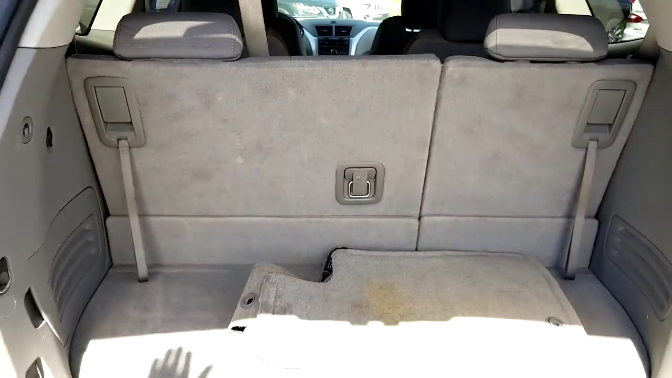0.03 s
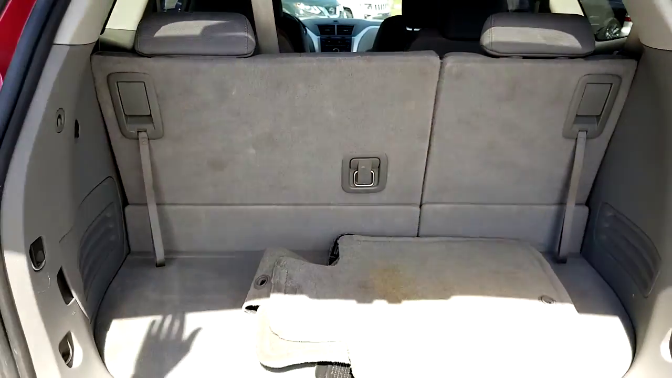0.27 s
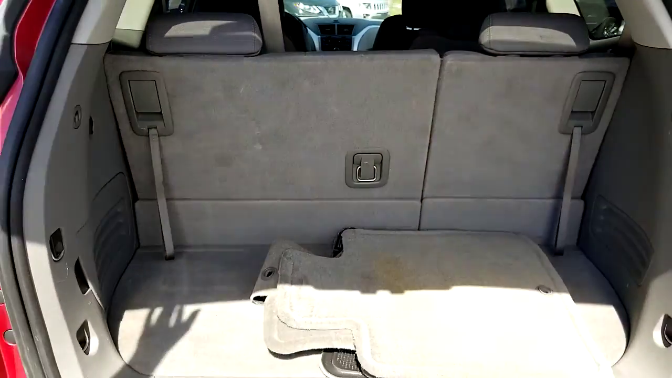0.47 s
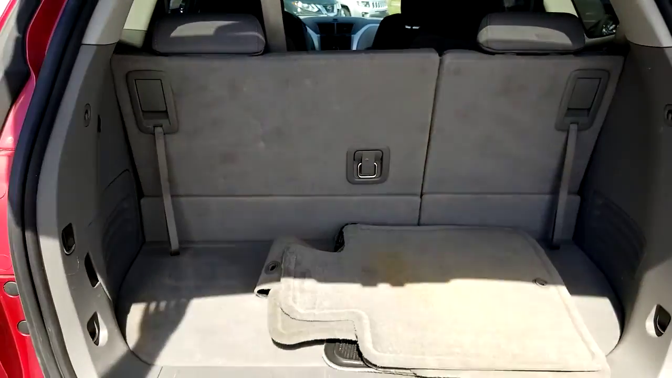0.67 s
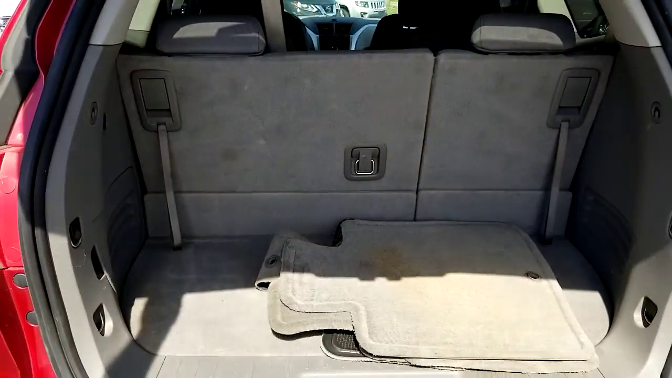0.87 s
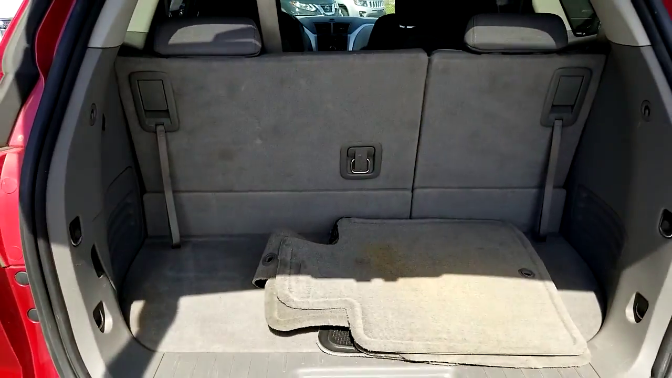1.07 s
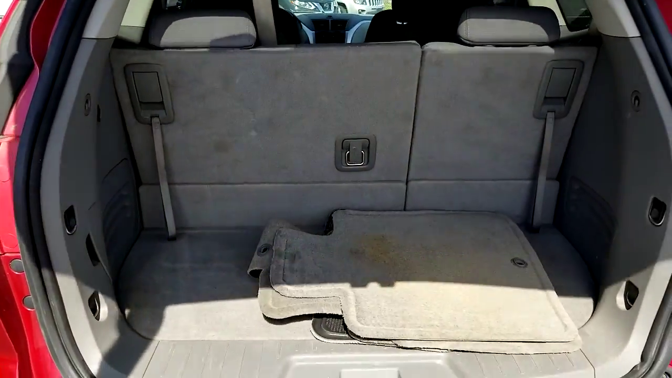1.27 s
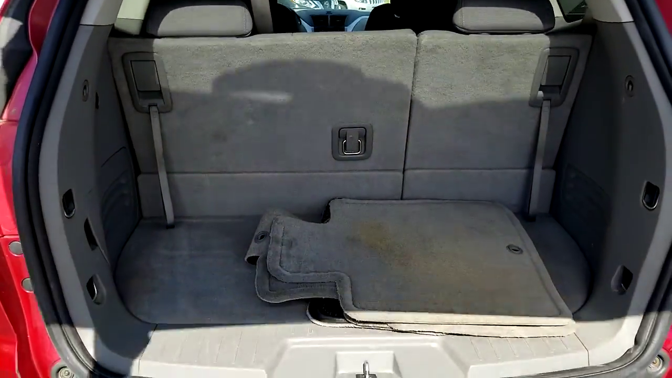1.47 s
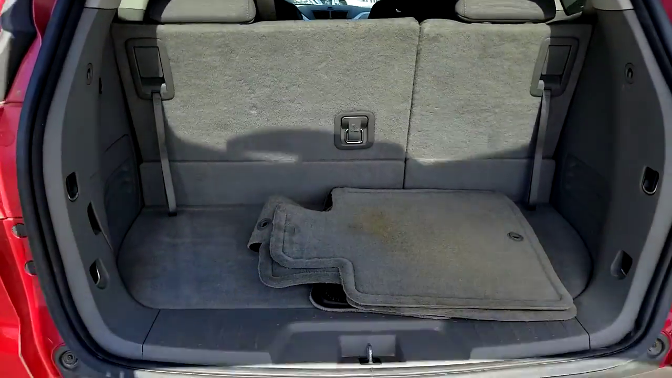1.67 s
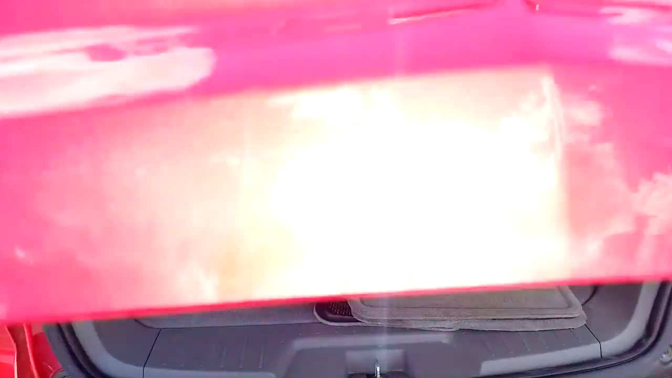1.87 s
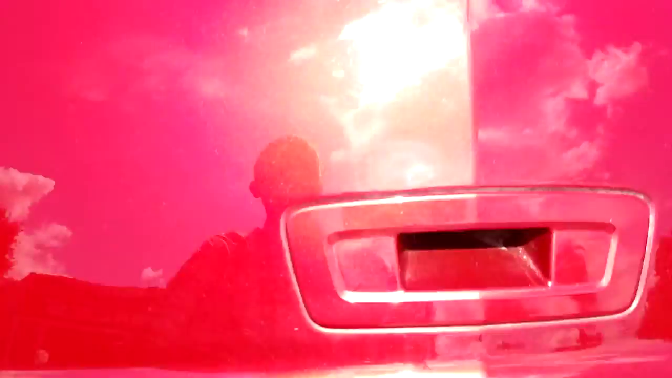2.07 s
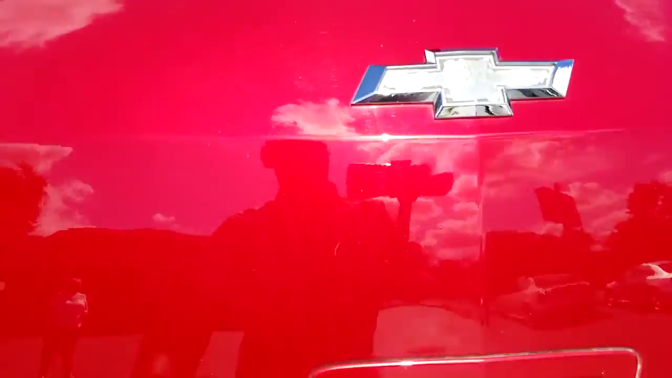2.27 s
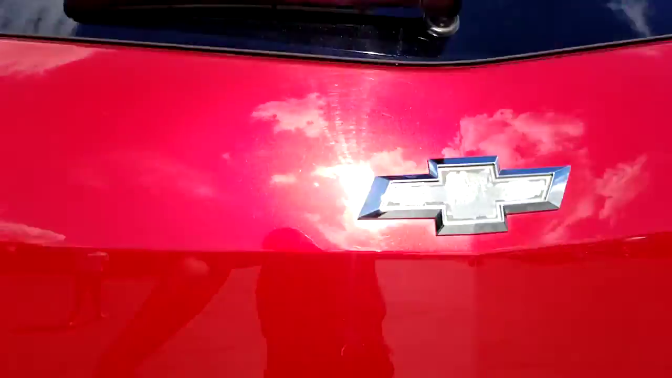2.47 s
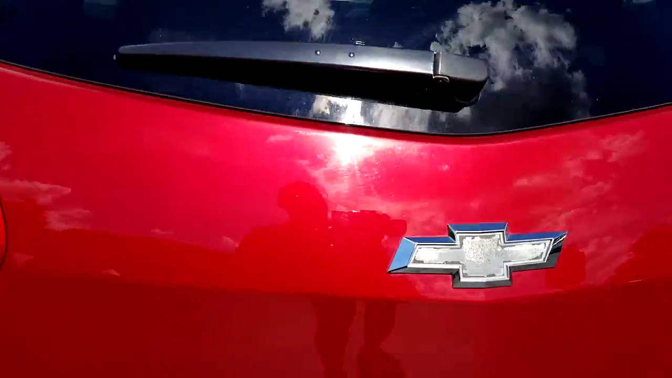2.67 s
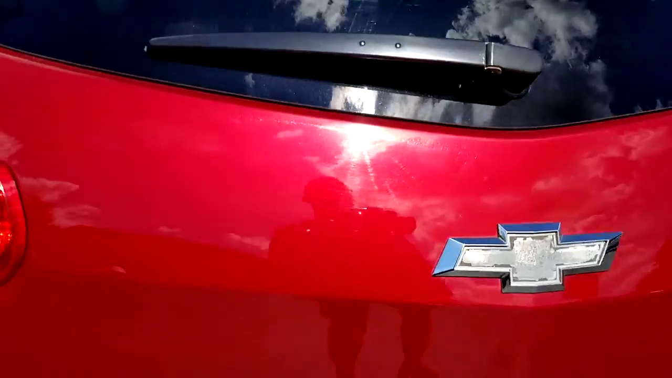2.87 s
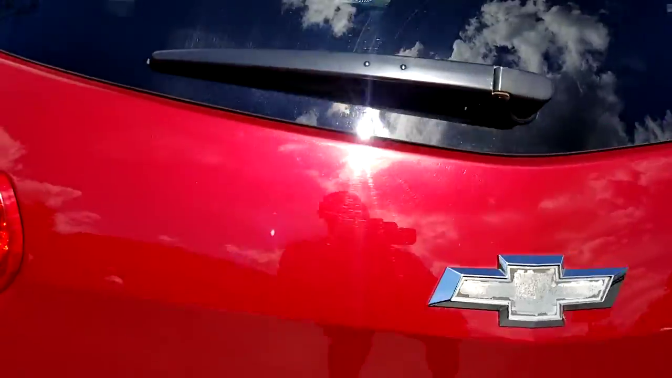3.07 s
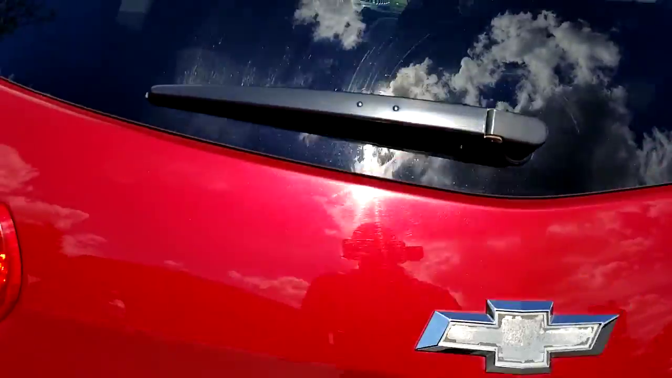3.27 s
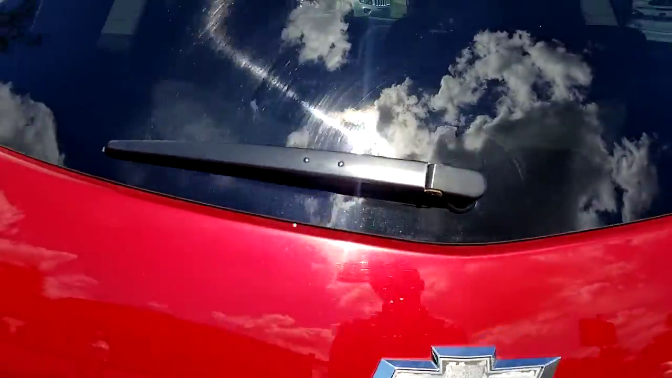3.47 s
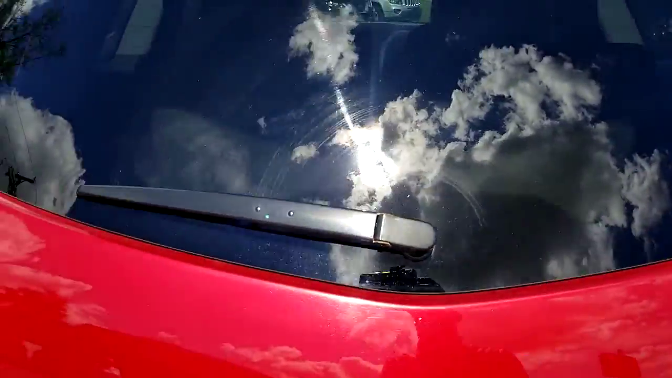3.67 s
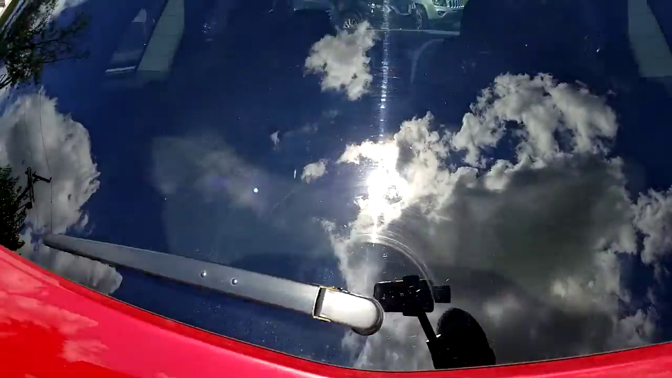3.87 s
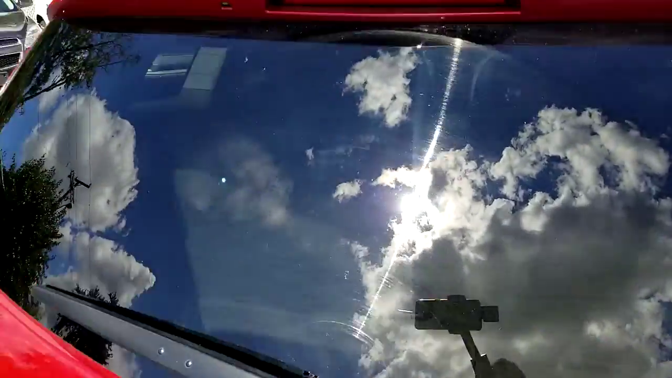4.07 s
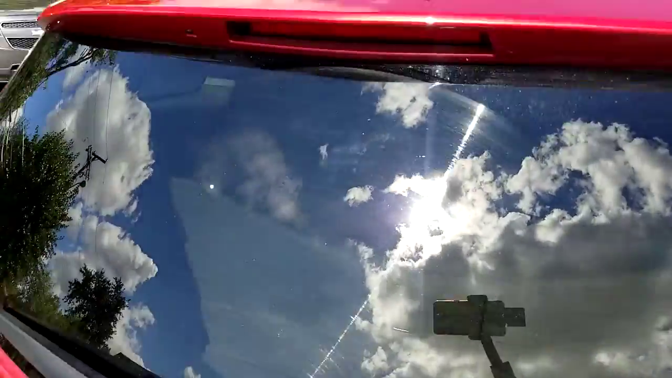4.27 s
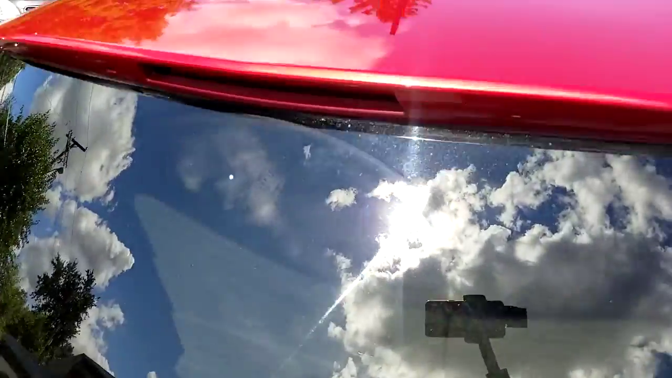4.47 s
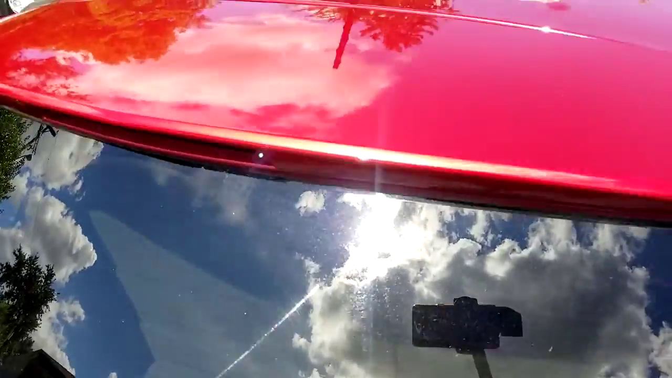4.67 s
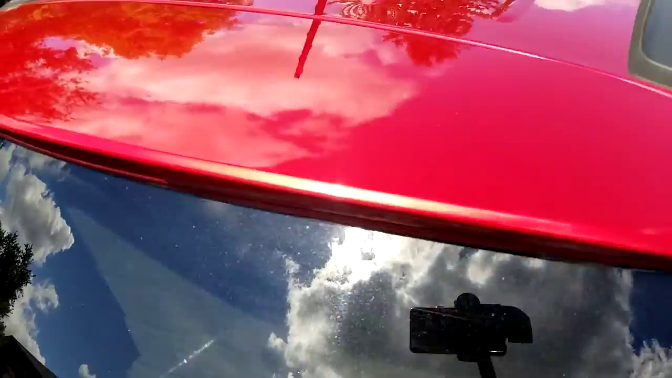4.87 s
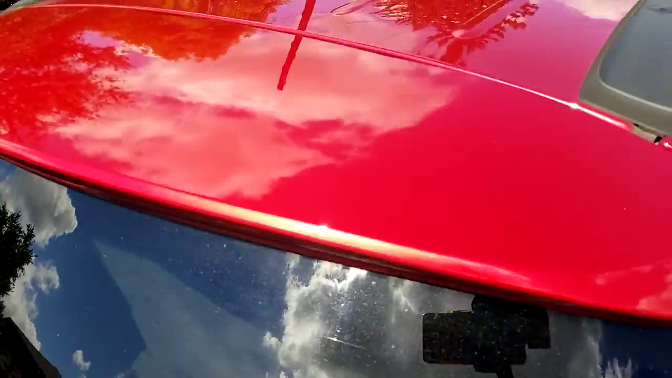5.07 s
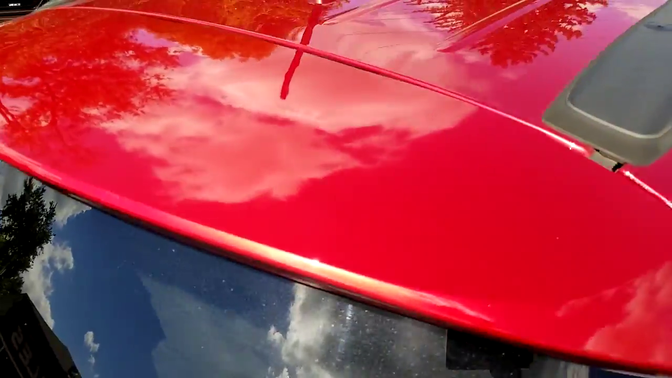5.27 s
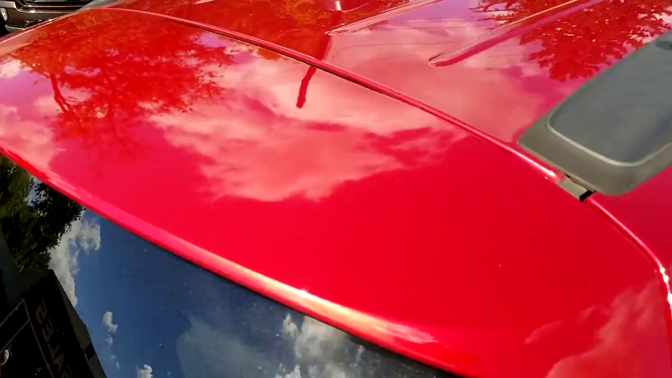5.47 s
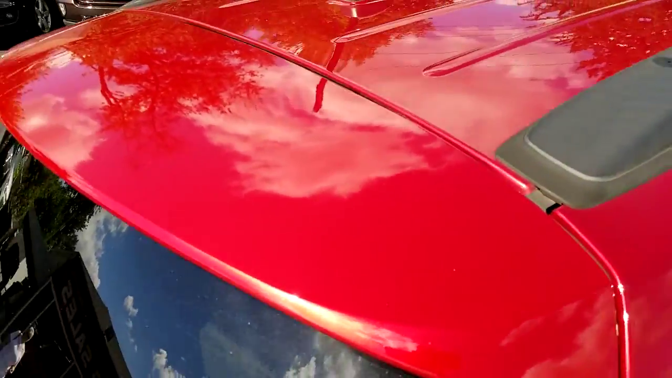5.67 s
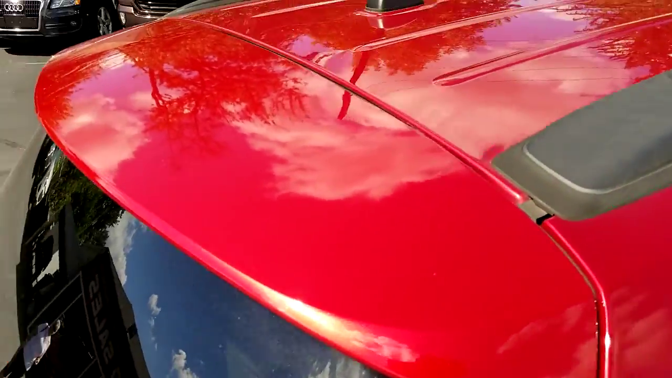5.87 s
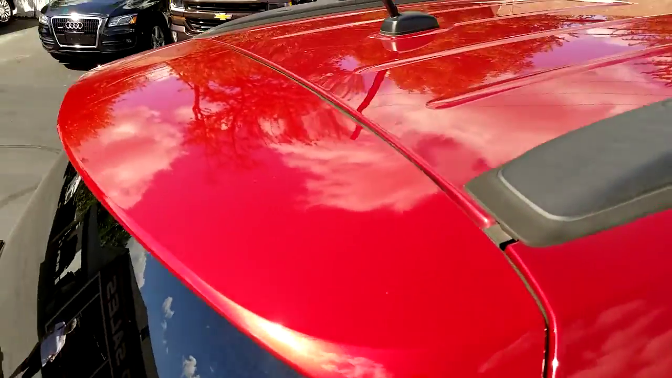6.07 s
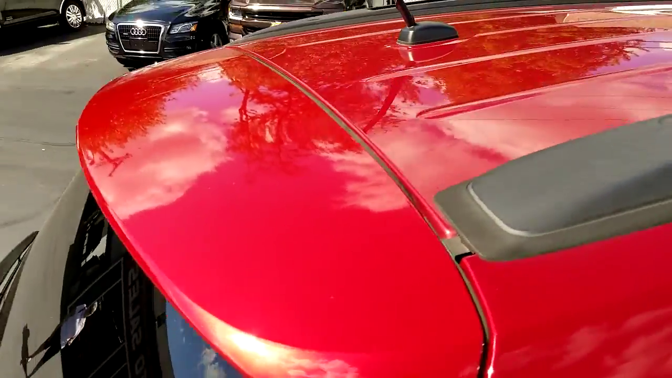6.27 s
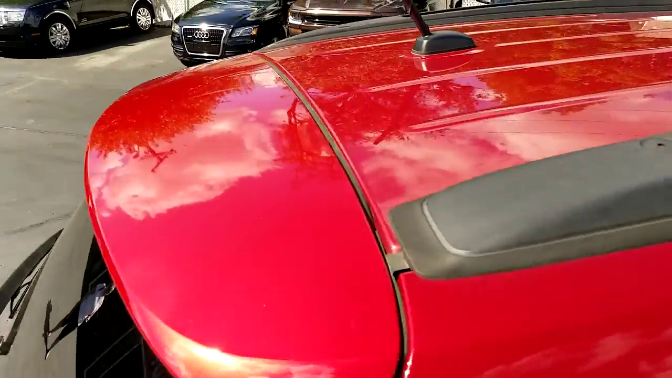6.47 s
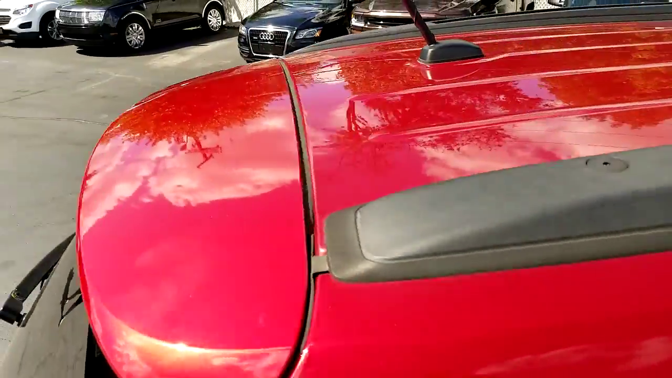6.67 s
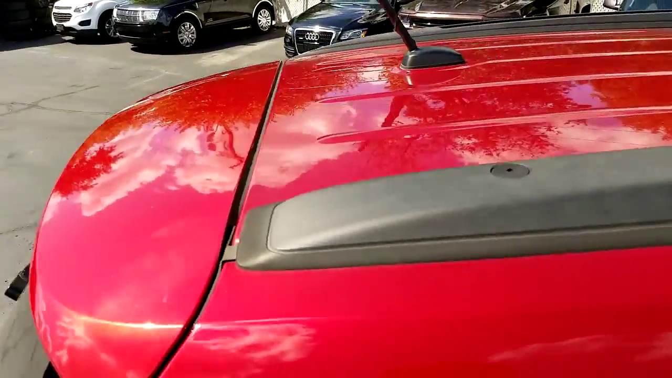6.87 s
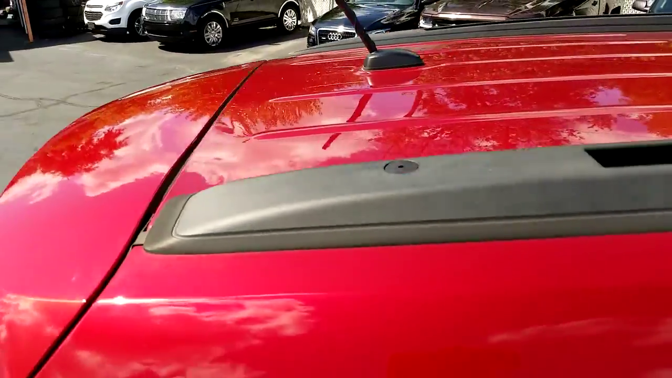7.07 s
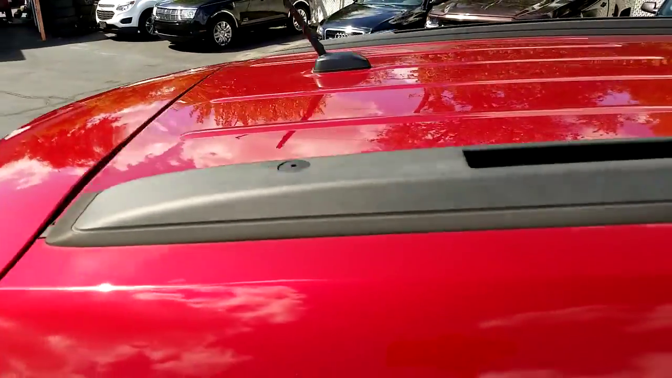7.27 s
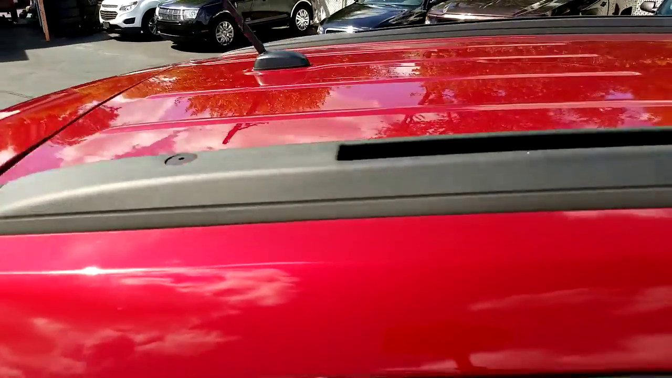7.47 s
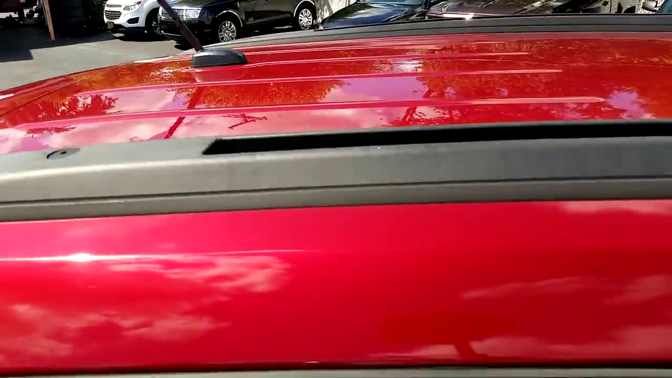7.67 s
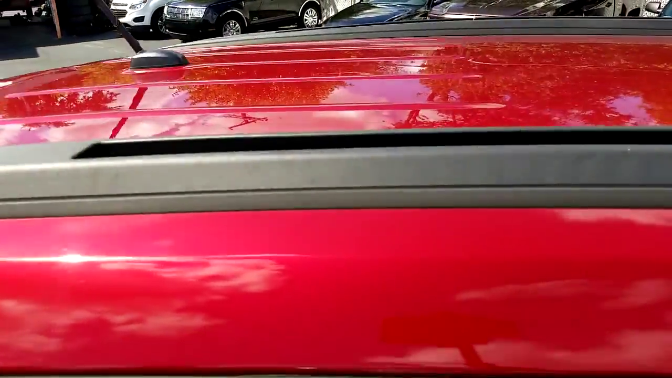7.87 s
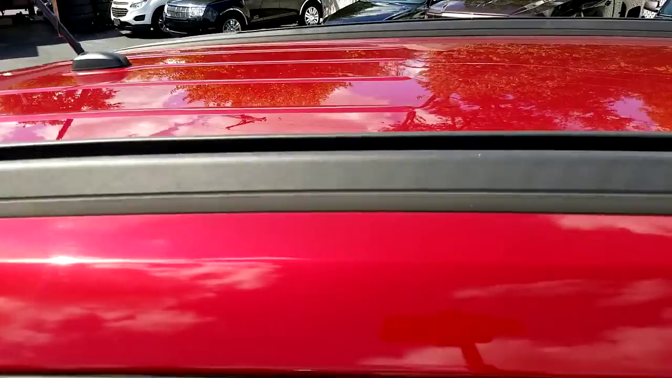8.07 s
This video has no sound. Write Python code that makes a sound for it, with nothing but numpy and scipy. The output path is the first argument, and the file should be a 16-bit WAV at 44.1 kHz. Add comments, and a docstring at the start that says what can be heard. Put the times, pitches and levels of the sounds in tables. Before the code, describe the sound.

Wind thumps the microphone, a car hatch creaks down with hollow knocks and slams with rattle and boom, then a car pulls away nearby.

```python
"""Hatch slam and car pulling away

A car's rear hatch creaks down with hollow knocks and slams: struck modes, rattling noise, a cabin-air boom.
A six-cylinder car nearby pulls away, its note and shaft orders climbing with the firing rate. Shaped noise gives
wind in two microphone ports, far traffic, hums, scuffs and squeaks; damped modes with noise give clicks.
Gain control ducks after the slam and slowly comes back."""
import sys
import numpy as np
from scipy import signal
from scipy.fft import rfft, irfft, next_fast_len
from scipy.io import wavfile
from scipy.ndimage import uniform_filter1d, map_coordinates

SR = 44100
rng = np.random.default_rng(int(sys.argv[2]) if len(sys.argv) > 2 else 0)


def wav_record(signal):
    """Record a signal, one row per channel, as 16-bit PCM in the file named by sys.argv[1]."""
    frames = np.transpose(np.atleast_2d(signal))
    bounded = np.clip(frames, -1, 1)
    # unit amplitude maps onto the largest positive 16-bit level
    quanta = np.round(bounded * 32767).astype(np.int16)
    wavfile.write(sys.argv[1], SR, quanta)


N = 358533


def amp(db):
    """Decibels to amplitude."""
    return 10 ** (np.asarray(db) / 20)


def unit(x):
    """x scaled to rms 1."""
    return x / np.sqrt(np.mean(x ** 2) + 1e-20)


def along(points, hz):
    """Interpolates (hz, value) points on a log frequency axis."""
    f, v = np.transpose(points)
    return np.interp(np.log(hz + 1), np.log(f + 1), v)


def curves(rows):
    """One value per sample for each column after the time."""
    s, *cols = np.transpose(rows)
    return [np.interp(np.arange(N) / SR, s, c) for c in cols]


def wobble(rate):
    """Smooth random curve with rate knots per second."""
    knots = rng.standard_normal(int(N * rate / SR) + 4)
    return map_coordinates(knots, [np.arange(N) * rate / SR])


def filtered(x, response):
    """x times a response of frequency."""
    n = x.shape[-1]
    m = next_fast_len(n + 4096)
    return irfft(rfft(x, m) * response(np.fft.rfftfreq(m, 1 / SR)), m)[..., :n]


def noise(t, colour, tilt=np.ones_like):
    """Coloured noise of rms 1, then tilted."""
    coloured = unit(filtered(rng.standard_normal(np.shape(t)), colour))
    return filtered(coloured, tilt)


def rush(spectrum, patchy_db):
    """Patchy noise, rms 1 at the left port, as rows: shared, left only, right only."""
    # share heard by both ports: hz, share
    alike = [(60, 0.98), (300, 0.79), (1000, 0.78), (3000, 0.2), (10000, 0.043)]
    z = signal.stft(rng.standard_normal((3, N)), nperseg=512)[2]
    field = uniform_filter1d(rng.standard_normal(z.shape[1:]), size=5, axis=0)
    field = uniform_filter1d(field, size=10, axis=1)
    rows = signal.istft(z * amp(patchy_db * unit(field)), nperseg=512)[1][:, :N]

    def response(hz):
        share = np.clip(along(alike, hz), 0, 1)
        return amp(along(spectrum, hz)) * np.sqrt([share, 1 - share, 1 - share])

    rows = filtered(rows, response)
    return rows / np.sqrt(np.mean(rows[0] ** 2 + rows[1] ** 2))


def ring(modes, t, scatter, blur_hz=0):
    """Damped modes with random strength and pitch; a drifting phase blurs each line."""
    chance = scatter * rng.standard_normal((len(modes), 2)) * [2, .03]  # dB, share of pitch
    steps = uniform_filter1d(rng.standard_normal((len(modes), len(t))), size=150)
    drift = np.cumsum(steps, axis=1) * np.sqrt(2 * np.pi * blur_hz / SR)
    return sum(amp(db + more_db - 60 * t / t60) * np.sin(2 * np.pi * hz * (1 + bend) * t + phase)
               for (hz, db, t60), (more_db, bend), phase in zip(modes, chance, drift))


def add(track, s, sound):
    """Mixes a sound in at time s."""
    start = round(s * SR)
    track[..., start:start + sound.shape[-1]] += sound


def delayed(x, ms):
    """x, late by ms."""
    return map_coordinates(x, [np.arange(N) - ms * SR / 1000], mode="nearest")


def slam():
    """Each contact rings latch and panel and shakes the trim along the whole width."""
    # latch, seal and rebound contacts: start_s, latch_db, panel_db, rattle_db, rattle_t60_s,
    # rattle_tilt_db_per_octave
    contacts = [(2.648, -16.5, -27, -17.5, 0.028, -2.5), (2.652, -12.5, -29, -20, 0.012, -7),
                (2.662, -15.5, -15.5, -25.5, 0.16, -4.5), (2.664, -38, -18.5, -19, 0.048, 3),
                (2.686, -25, -14.5, -27.5, 0.02, 2.5), (2.727, -43, -28, -26, 0.029, 2.5),
                (2.737, -31, -21.5, -16, 0.027, 0.5), (2.751, -40, -32, -28.5, 0.036, -4),
                (2.778, -33.5, -27.5, -31.5, 0.014, 0.5)]
    # latch modes: pitch_hz, level_db, t60_s
    latch_modes = [(843, 0.5, 0.068), (1007, -3.5, 0.045), (1504, -1, 0.0085)]
    # sheet-metal modes: pitch_hz, level_db, t60_s
    panel_modes = [(155.2, -0.5, 0.23), (202.4, 2, 0.18), (300, 2.5, .11), (434, -5.5, 0.13),
                   (624, -1.5, 0.15), (777, -8, 0.1), (1093, -12, .12)]
    # thin steel rung by the rebounds: pitch_hz, level_over_rattle_db, t60_s
    steel_modes = [(1600, -8, .06), (2340, -12, .05), (6150, -26, .07), (11000, -26, .055),
                   (13670, -33, .08)]
    # trim rattle spectrum: hz, db_per_hz
    rattle_spectrum = [(200, -34.5), (600, -8.5), (1300, -15), (2630, -26), (6040, -32), (12100, -37),
                       (15800, -43.5)]
    rebound_s, panel_side_db, blur_hz, rattle_hold_power = 2.7, -17, 24, 1.8
    out, t = np.zeros((2, N + SR)), np.arange(SR // 4) / SR
    attack = 1 - np.exp(-t / 0.0013)
    for s, latch_db, panel_db, rattle_db, t60, tilt_db in contacts:
        sheet = lambda: ring(panel_modes, t, scatter=0.66, blur_hz=blur_hz)
        panel = sheet() + amp(panel_side_db) * sheet() * [[1], [-1]]  # uneven left to right
        latch = ring(latch_modes, t, scatter=0.34, blur_hz=blur_hz)
        metal = amp(latch_db) * latch + amp(panel_db) * panel
        apart = noise([t, t], lambda hz: amp(along(rattle_spectrum, hz)),
                      lambda hz: amp(tilt_db * np.log2((hz + 500) / 3500)))
        # the lows are alike at both ports
        side = filtered(apart[0] - apart[1], lambda hz: hz ** 2 / (hz ** 2 + 800 ** 2))
        apart = apart.mean(axis=0) + [[.5], [-.5]] * side
        thin = (s > rebound_s) * ring(steel_modes, t, scatter=.3, blur_hz=blur_hz)
        decay = amp(-60 * (t / t60) ** rattle_hold_power)  # holds, then drops
        add(out, s, (metal + amp(rattle_db) * (decay * apart + thin)) * attack)
    return out[:, :N]


def boom():
    """The seal squeezes the cabin air, which rings with the hatch frame in low modes."""
    # seal pushes: start_s, level_db
    pushes = [(2.6639, -0.5), (2.6865, -5)]
    # cabin air and hatch frame modes: pitch_hz, level_db, t60_s
    cabin_modes = [(69.6, -1.5, 0.3), (51, -5.5, 0.14), (116.6, -16.5, 0.3), (191, 0.5, .045)]
    out, t = np.zeros((2, N + SR)), np.arange(SR // 4) / SR
    for s, db in pushes:
        add(out, s, -amp(db) * ring(cabin_modes, t, scatter=0) * (1 - np.exp(-t / .003)))
    return out[:, :N]


def knocks():
    """The moving hatch knocks at hinges and struts: short hollow modes, each with one hollower bounce."""
    # hinge and strut knocks: start_s, level_db, pitch_hz
    hits = [(0.984, -30.5, 677), (1.106, -36, 715), (1.201, -30, 712), (1.33, -32.5, 679),
            (1.417, -32, 670), (1.634, -31, 572), (2.255, -30, 602), (2.468, -27, 612)]
    bounce_s, bounce_db = 0.011, -1.5
    out, t = np.zeros((2, N + SR)), np.arange(SR // 4) / SR
    attack = 1 - np.exp(-t / 0.0018)
    for s, db, hz in hits:
        modes = [(hz, -3, .04), (.76 * hz, -4, .05), (1.25 * hz, -6, .05), (1.6 * hz, -10, .03)]
        add(out, s, amp(db) * ring(modes, t, scatter=.5) * attack)
        bounce = ring([(1.073 * hz, 0, .06)], t, scatter=0.43)
        add(out, s + bounce_s, amp(db + bounce_db) * bounce * attack)
    return out[:, :N]


def engine():
    """Three firings a turn give the note; unequal cylinders fill in the other shaft orders."""
    # pulling car: time_s, firing_hz, level_db
    drive = [(3.3, 46, -41), (3.55, 48.77, -31), (3.8, 56.26, -26.5), (4.11, 65.64, -27),
             (4.25, 67.82, -27), (4.99, 69, -25.5), (5.26, 73.4, -31.5), (5.55, 76.78, -23),
             (5.9, 80.92, -25), (6.2, 83.57, -23.5), (6.7, 89.26, -25), (7, 89.5, -26.5), (8.13, 90.7, -29)]
    # exhaust passing the note: hz, gain_db
    pipe = [(48, -11.5), (56, -12.5), (66, 3.5), (90, -0.8), (105, 5.5), (135, -7.5), (155, 2.5),
            (180, -1.5)]
    # pipe resonances the orders glide through while pulling: hz, gain_db
    pull = [(110, 1), (150, -15), (225, 4), (262, -8.5), (288, 4.5), (315, -3.5), (343, 0), (378, 1.5),
            (435, -13)]
    # shaft orders beside the note: order, cruise_db
    orders = [(4, -9), (5, 7), (7, -0.5), (8, -4), (10, -8), (11, -1), (12, -12), (13, -5.5), (14, -7),
              (15, -5.5), (16, -6.5)]
    # exhaust noise: hz, db_per_hz
    rasp_spectrum = [(350, -46), (520, -14.5), (700, 1.5), (850, 6.5), (1100, -11.5), (1800, -42)]
    second_db = -7  # second harmonic before the pipe
    growl_full_db, growl_db_per_octave, growl_follows, full_hz = -45.5, 50, 0.17, 79.7
    ease_start_s, ease_end_s, eased_duller = 6.7, 7.0, 1.217  # throttle eases; noise pitch divisor
    clear_start_s, clear_end_s, edge_s = 4.4, 5.02, 0.22  # outside: passes behind parked cars
    waver_clear, waver_hidden = 0.041, 0.19  # random share of the note
    puff_power, puff_scatter_db = 1.6, 1.6  # narrowness and unevenness

    hz, level_db = curves(drive)
    t = np.arange(N) / SR
    turn = np.cumsum(hz / 3) * 2 * np.pi / SR  # shaft angle
    hidden = np.clip(np.maximum(clear_start_s - t, t - clear_end_s) / edge_s, 0, 1)
    waver = waver_clear + (waver_hidden - waver_clear) * hidden
    # moving reflections shake level and phase
    path = lambda: 1 + waver * (wobble(14) + .6j * wobble(14))
    first = amp(level_db + along(pipe, hz)) * path() * np.exp(3j * turn)
    second = amp(level_db + second_db + along(pipe, 2 * hz)) * path() * np.exp(6j * turn)
    note = first + second

    eased = np.interp(t, [ease_start_s, ease_end_s], [0, 1])
    growl = np.zeros(N)
    for k, cruise_db in orders:
        order_db = along(pull, k * hz / 3) * (1 - eased) + cruise_db * eased + 1.8 * wobble(4)
        growl += amp(order_db) * np.cos(k * turn + 2 * np.pi * rng.random() + .2 * wobble(5))
    growl_db = growl_full_db + growl_db_per_octave * np.log2(np.minimum(hz / full_hz, 1))
    growl_db = growl_db + growl_follows * (level_db - level_db.max())

    firing = np.cos(3 * turn / 2) ** 2  # one swell per firing
    puffs = unit((0.45 + firing ** puff_power) * amp(puff_scatter_db * wobble(40)))
    pulling = noise(t, lambda f: amp(along(rasp_spectrum, f)))
    cruising = noise(t, lambda f: amp(along(rasp_spectrum, f * eased_duller)))
    rasp = amp(growl_db) * puffs * (np.sqrt(1 - eased) * pulling + np.sqrt(eased) * cruising)
    fade = np.clip((t - drive[0][0]) / 0.14 + 1, 0, 1)
    return fade * (rasp - np.sqrt(2) * (note.real + amp(growl_db) * growl))


def scuffs():
    """Cloth or shoe strokes close by: grainy noise, partly different at each port."""
    # strokes: start_s, length_s, level_db
    strokes = [(0.183, 0.092, -48.5), (0.732, 0.06, -51.5), (2.867, 0.12, -63), (5.671, 0.079, -57),
               (7.06, 0.28, -59), (7.53, 0.076, -60.5)]
    # scrape spectrum: hz, db_per_hz
    scrape_spectrum = [(400, -14), (2000, -2), (3500, -2), (5200, 0), (7000, -5), (12000, -12),
                       (15800, -20)]
    out, t = np.zeros((2, N + SR)), np.arange(SR // 4) / SR
    scrape = lambda f: amp(along(scrape_spectrum, f))
    for s, length, db in strokes:
        stroke = np.clip(np.minimum(t / 0.0052, (length - t) / (0.81 * length)), 0, 1)
        grain = amp(2.2 * unit(uniform_filter1d(rng.standard_normal(len(t)), size=150)))
        add(out, s, amp(db) * stroke * grain * (noise(t, scrape) + 1.1 * noise([t, t], scrape)))
    return out[:, :N]


def clicks():
    """A small hard part rings in damped modes under a brief noise burst."""
    # clicks: start_s, level_db
    taps = [(1.653, -36.5), (4.878, -44), (6.962, -50)]
    # hard part modes: pitch_hz, level_db, t60_s
    part_modes = [(1765, 3, 0.031), (2980, 5, 0.0037), (4600, 0.5, 0.02), (6300, -2, 0.006),
                  (8600, -3, 0.019), (11800, -13, 0.0084)]
    out, t = np.zeros((2, N + SR)), np.arange(SR // 4) / SR
    for s, db in taps:
        burst = amp(-60 * t / 0.0066) * rng.standard_normal(len(t))
        add(out, s, amp(db) * (ring(part_modes, t, scatter=0.16) + burst))
    return out[:, :N]


def squeaks():
    """Short squeaks: decaying narrow-band noise."""
    # squeaks: start_s, level_db, pitch_hz, t60_s, width_octaves
    chirps = [(0.502, -45, 5200, .03, .15), (0.505, -42, 3550, 0.035, .07), (1.24, -61, 5300, 0.26, .04),
              (1.365, -54, 3500, 0.06, 0.09)]
    out, t = np.zeros((2, N + SR)), np.arange(SR // 4) / SR
    for s, db, hz, t60, octaves in chirps:
        band = lambda f: np.exp(-.5 * (np.log2((f + 1) / hz) / octaves) ** 2)
        add(out, s, amp(db - 60 * t / t60) * noise(t, band))
    return out[:, :N]


def hums():
    """Narrow noise of things running nearby: gliding carriers with random slow amplitudes."""
    # fuzzy hums and a whine: start_s, end_s, start_hz, end_hz, width_hz, level_db, left_lag_ms
    tones = [(.9, 2.7, 88, 90, 16, -35, .2), (.4, 1.4, 135, 135, 16, -41, .2),
             (.9, 1.7, 490, 515, 45, -48.5, .1), (1.55, 3.5, 800, 800, 70, -56, .1),
             (.7, 2.65, 4720, 4400, 150, -69.5, .42), (4.95, 5.4, 680, 670, 80, -47.5, .1),
             (3.95, 4.45, 2350, 2580, 300, -55, .42), (3.8, 5.7, 1800, 1150, 450, -55.5, .3),
             (3.7, 4.1, 4640, 4740, 280, -69, .42)]
    out, t = np.zeros((2, N)), np.arange(N) / SR
    for s0, s1, hz0, hz1, width_hz, db, lag_ms in tones:
        phase = np.cumsum(np.interp(t, [s0, s1], [hz0, hz1])) * 2 * np.pi / SR
        swell = np.sqrt(np.sin(np.interp(t, [s0, s1], [0, np.pi])).clip(0))
        carrier = wobble(width_hz) * np.cos(phase) + wobble(width_hz) * np.sin(phase)
        hum = amp(db) * swell * carrier
        out += [np.roll(hum, round(lag_ms * SR / 1000)), hum]
    return out


def wind():
    """Buffeting of the ports: low noise lumps that differ from port to port, and single puffs."""
    # buffeting: time_s, level_db
    buffeting = [(0, -33.5), (.9, -38), (1.7, -52.5), (2.7, -37), (3.6, -55), (4.7, -56.5), (5.3, -37.5),
                 (6.3, -40.5), (7, -49)]
    # single puffs: start_s, peak_db, pitch_hz, left_over_right_db
    thumps = [(0.09, -8, 109, 3), (0.196, -7.5, 106, -4), (0.217, -16.5, 60.4, -19),
              (0.698, -17.5, 51.5, 1), (0.72, -11.5, 83.5, 3.5)]
    spectrum = [(12, -41.5), (45, -5.5), (130, -7), (300, -31.5), (600, -82.5)]  # hz, db_per_hz
    low = lambda hz: amp(along(spectrum, hz))
    gusts = amp(2.3 * np.array([wobble(9.9), wobble(3.5)]))
    lumps = gusts * filtered(rng.standard_normal((2, N)), low)
    out, t = amp(curves(buffeting)[0]) * unit(lumps), np.arange(SR // 8) / SR
    for s, db, hz, pan_db in thumps:
        puff = 1.83 * np.sin(2 * np.pi * hz * t) * hz * t * np.exp(1 - 3.0 * hz * t)
        add(out, s, amp(db + pan_db * np.array([[.5], [-.5]])) * puff)
    return out


def traffic(turned):
    """Far traffic as patchy noise bands: low rumble and roar, high hiss and air, tyre sizzle on the left."""
    # far traffic: time_s, hiss_db, air_db
    lot = [(0, -51, -63), (.54, -51.5, -62.5), (1.65, -50, -58.5), (2.04, -51.5, -63), (3, -52, -63),
           (3.5, -52.5, -72), (4.15, -47, -65), (4.66, -50.5, -67.5), (5.75, -46.5, -63),
           (6.6, -47.5, -63.5), (7.3, -46.5, -60.5), (8.13, -48.5, -67.5)]
    # rumble level: time_s, level_db
    rumble_level = [(0, -31.5), (.8, -37), (4.6, -35), (6.5, -32), (8.13, -34.5)]
    # band spectra: hz, db_per_hz
    rumble, roar = [(25, -20), (59, -3), (87, -1), (99, -3.5), (139, -7.5), (223, -13), (271, -16.5),
                    (450, -27.5), (580, -32), (990, -120)], [(180, -37), (300, -4), (400, -1.5), (600, -5), (940, -9), (2000, -48.5)]
    hiss, air = [(650, -27.5), (1100, 7), (1700, 0), (2630, -5.5), (3400, -13), (5540, -14.5), (6800, -16),
                 (9500, -51)], [(5000, -39.5), (8000, -1.5), (10000, -7.5), (12600, -6.5), (15800, -12)]
    # brighter tyre noise of the road on the left: hz, db_per_hz
    sizzle = [(2000, -34), (3300, 1), (5500, -2.5), (7000, -6.5), (9000, -32.5)]
    roar_mean_db, roar_follows, sizzle_under_hiss_db = -46.5, 0.96, -12
    (hiss_db, air_db), (rumble_db,) = curves(lot), curves(rumble_level)
    roar_db = roar_mean_db + roar_follows * (hiss_db - hiss_db.mean())
    swell = wobble(4)
    low = amp(rumble_db + 1.7 * wobble(9)) * rush(rumble, patchy_db=1.5)
    low = low + amp(roar_db + 0.49 * swell) * rush(roar, patchy_db=2.5)
    high = amp(hiss_db + 0.33 * swell + 0.53 * wobble(10)) * rush(hiss, patchy_db=2.0)
    high = high + amp(air_db + 0.77 * swell + 1.1 * wobble(14)) * rush(air, patchy_db=2.5)
    high = high + amp(hiss_db + sizzle_under_hiss_db) * np.sin(turned) * rush(sizzle, patchy_db=5.0)
    return low, high


def scene():
    """Far sounds reach one port late, by a lag that changes as the ports turn; most near ones arrive together."""
    # car and rumble: time_s, left_lag_ms
    car_lag = [(3, .2), (4, .3), (6, .3), (7.2, .12), (8.13, .14)]
    turn_start_s, turn_end_s = 5, 7.2
    road_right_lag_ms, road_left_lag_ms = .42, -.38  # left port's lag, road on the right, then left
    turned = np.interp(np.arange(N) / SR, [turn_start_s, turn_end_s], [0, np.pi / 2])
    low, high = traffic(turned)
    car, road = low[0] + engine(), high[0]
    left = delayed(car, curves(car_lag)[0])
    left = left + np.cos(turned) * delayed(road, road_right_lag_ms)
    left = left + np.sin(turned) * delayed(road, road_left_lag_ms)
    far = np.array([left, car + road]) + low[1:] + high[1:]
    hatch = slam() + boom() + knocks()
    return far + hatch + scuffs() + clicks() + squeaks() + hums() + wind()


def record(dry):
    """Gain control turns down at loud peaks and climbs back steadily; then soft limit and band limit."""
    # microphone response with a dip: hz, gain_db
    mic = [(6800, 1), (8600, -11), (10500, -2)]
    threshold_db, top_hz = -14.0, 15830
    power = np.abs(uniform_filter1d(np.mean(dry ** 2, axis=0), size=441))
    level_db = 10 * np.log10(power + 1e-12)
    climb_db = 3.65 * np.arange(N) / SR  # release of the held excess
    held_db = np.maximum.accumulate(np.maximum(level_db - threshold_db, 0) + climb_db) - climb_db
    cut_db = uniform_filter1d(0.5 * held_db, size=2205, origin=1100)  # lags the peak
    x = dry * amp(-cut_db)
    x = x / (1 + np.abs(x) ** 8) ** (1 / 8)
    return filtered(x, lambda hz: amp(along(mic, hz)) * (hz < top_hz))


dry = scene()
out = record(dry)
wav_record(out)
```